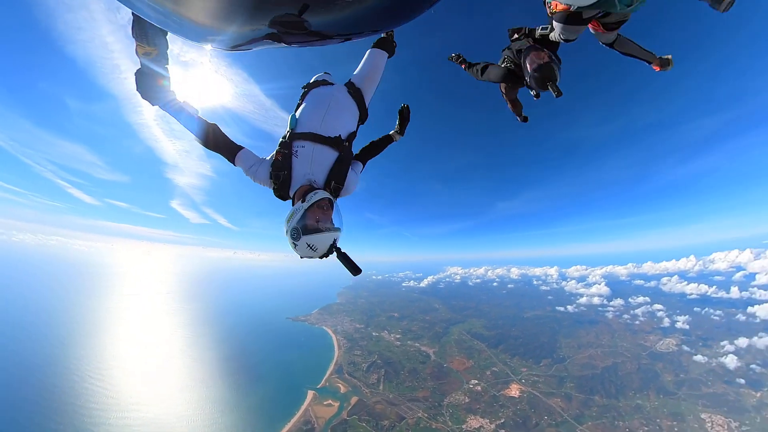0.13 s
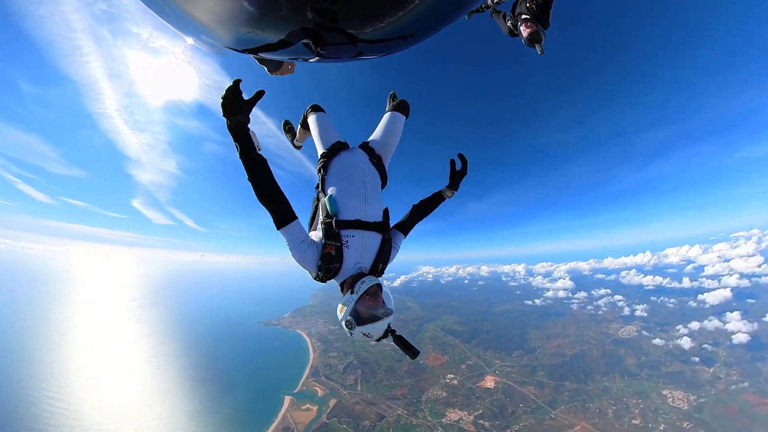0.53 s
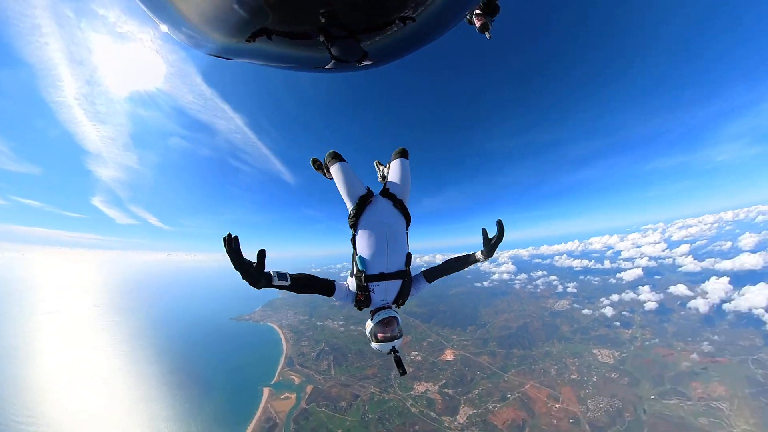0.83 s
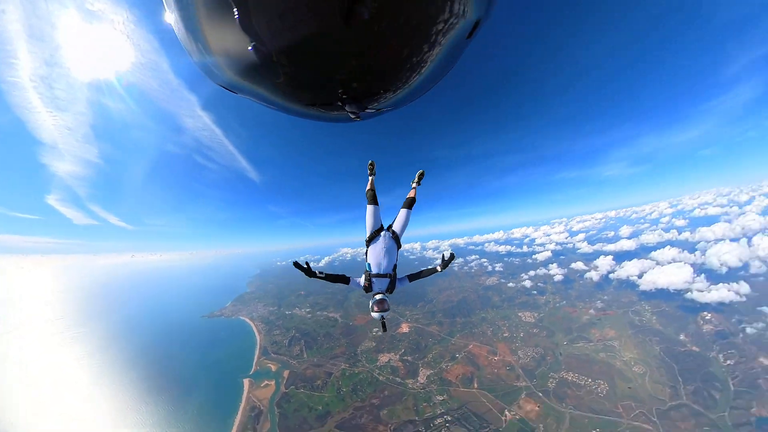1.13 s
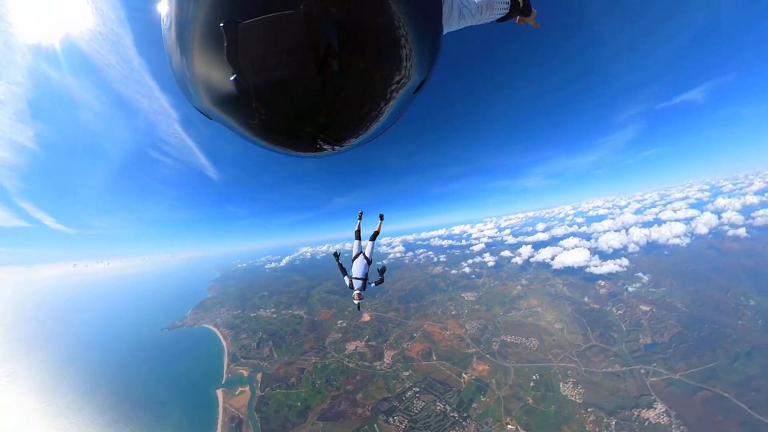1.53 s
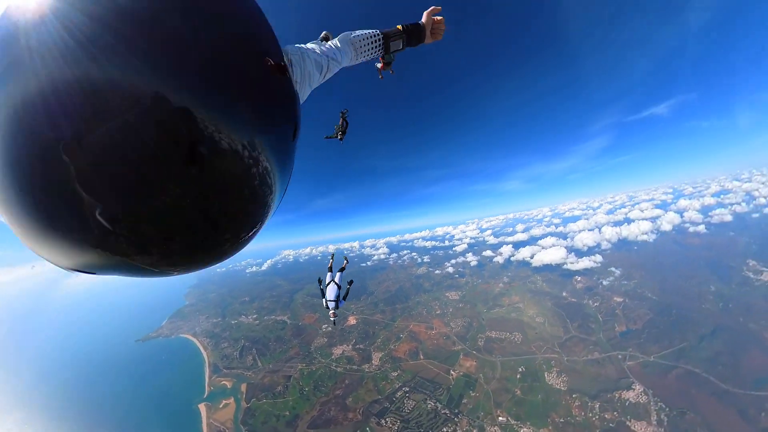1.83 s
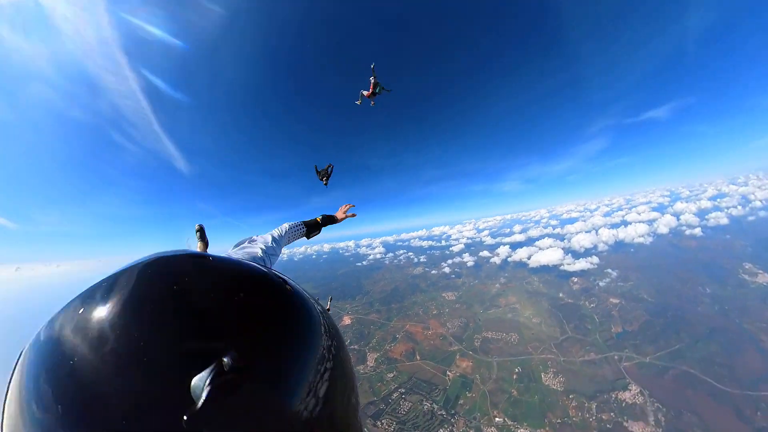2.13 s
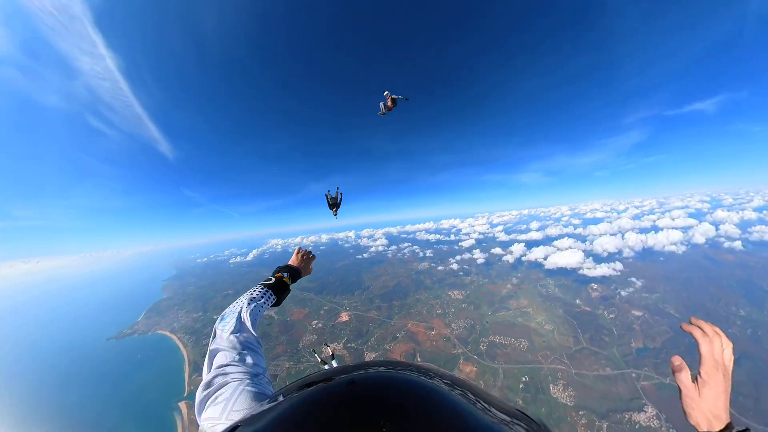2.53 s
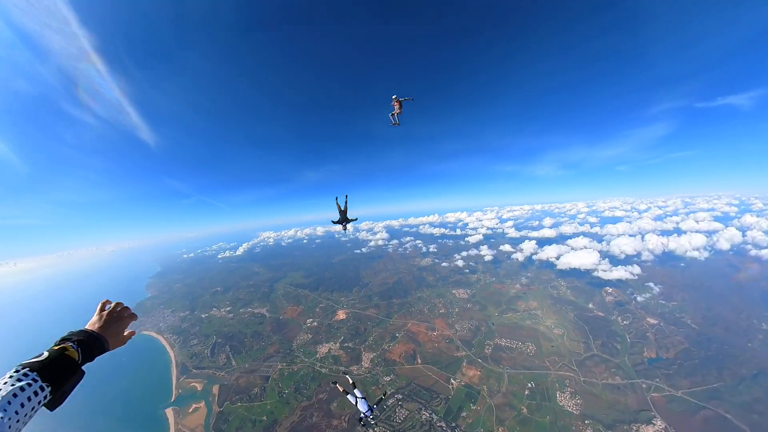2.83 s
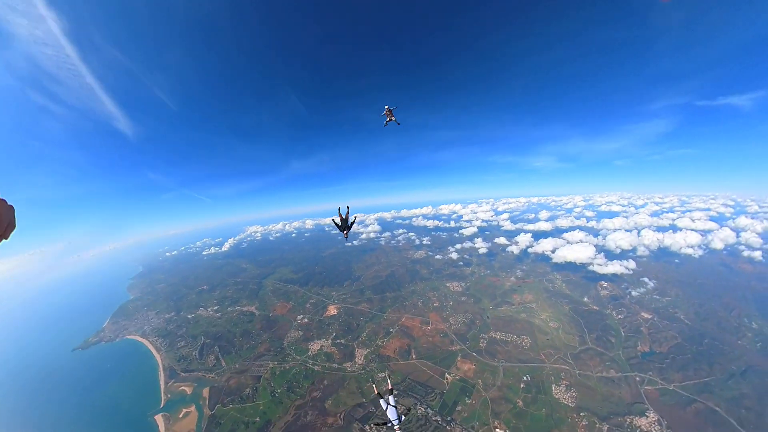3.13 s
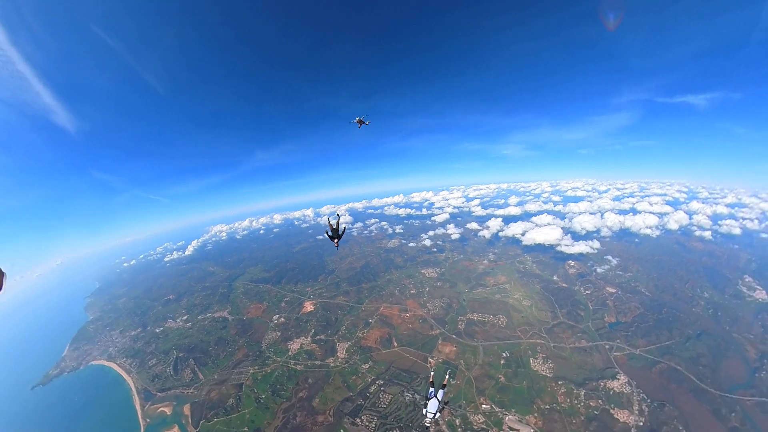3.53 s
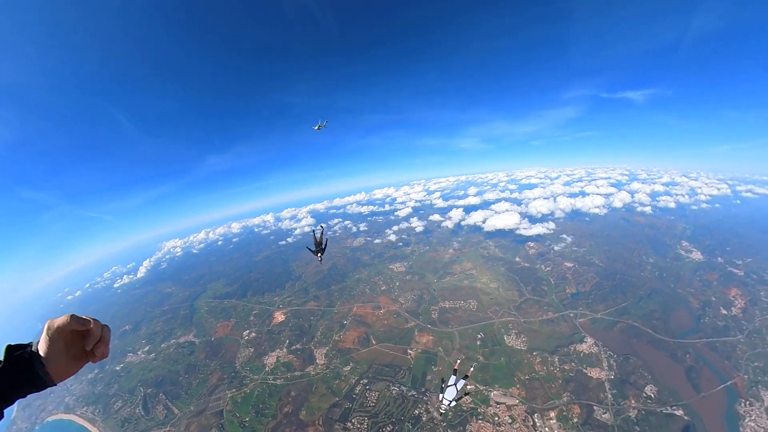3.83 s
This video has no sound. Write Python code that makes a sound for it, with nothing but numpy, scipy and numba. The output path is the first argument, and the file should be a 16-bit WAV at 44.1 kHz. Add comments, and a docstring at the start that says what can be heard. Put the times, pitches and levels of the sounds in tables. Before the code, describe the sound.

Fierce wind in skydiving freefall overloads a close helmet microphone, deep rumble left and thinner roar right, with crackles, a brief rising airy whistle on the left, then an abrupt dropout before the roar returns.

```python
"""Freefall wind tears at a helmet camera: heavy rumble on the left, a leaner roar and hiss on the right.
Each port shapes its own noise into three flickering bands; part of the rumble is common to both.
Pressure surges press a capsule against its end stop, so the roar crackles, breaks up or falls silent.
Pinned capsules flick and jolt, and the right port hums in short puffs like a blown bottle.
The left port whistles upward once as the head turns: noise through a climbing band-pass."""
import sys
import numpy as np
from scipy import signal
from scipy.fft import rfft, irfft
from scipy.io import wavfile
from scipy.ndimage import uniform_filter1d, minimum_filter1d
from numba import njit

SR = 44100
rng = np.random.default_rng(int(sys.argv[2]) if len(sys.argv) > 2 else 0)


def generate_wav(signal):
    """Clip the signal to [-1, 1] and save it as 16-bit WAV at the path in sys.argv[1]."""
    frames = np.transpose(np.atleast_2d(signal))
    scaled = np.clip(frames, -1, 1) * 32767
    pcm = np.round(scaled).astype(np.int16)
    wavfile.write(sys.argv[1], SR, pcm)


N = 176400

# Wind in each port before flicker and end stop; positive pressure pushes onto the stop:
# [t/s, rumble level/dB, roar level/dB, hiss level/dB, steady pressure/wind rms]
LEFT_WIND = [(0, -11, -21.5, -33, -3), (0.2, -7.5, -22.5, -31, -1), (0.36, -8.5, -21, -31.5, -1.5),
             (0.5, -11, -21, -36, -2.5), (0.6, -8.5, -27.5, -29.5, -0.5), (0.76, -10.5, -20.5, -32.5, -2.5),
             (0.95, -11, -22.5, -30, -1.5), (1.101, -5.5, -21, -29, -3.5), (1.25, -10.5, -16, -24.5, -2.5),
             (1.5, -9.5, -21.5, -33, -3.5), (1.65, -13.5, -18.5, -29.5, -4), (1.78, -14, -12.5, -27.5, -2),
             (2.22, -18, -20, -19.5, -2.5), (2.32, -15, -17.5, -17.5, -4), (2.421, -15, -12.5, -27.5, -2),
             (2.5, -25, -24.5, -40.5, -3), (2.58, -12.5, -14, -26.5, -1.5), (2.68, -14, -28, -41, -1.5),
             (2.78, -10, -17.5, -31.5, 0), (2.9, -16.5, -25.5, -35.5, -2), (3.02, -21, -23, -37, -2.5),
             (3.1, -14.5, -14, -24, -3), (3.2, -14.5, -19, -28, -2.5), (3.5, -14, -22.5, -33.5, -2.5),
             (3.75, -13.0, -21.5, -31, -2), (4, -7.5, -17, -26, -0.5)]
RIGHT_WIND = [(0, -31, -17.5, -23, -1), (0.148, -22, -14, -21, -2.1), (0.22, -27, -21.5, -32, -0.1),
              (0.32, -18, -10, -21, -0.28), (0.52, -24.5, -15.5, -22, -0.4), (0.71, -21, -10.5, -21, -0.95),
              (0.85, -23.5, -15.5, -25.5, -0.25), (1.08, -23.5, -17.5, -28.5, -0.7),
              (1.248, -29, -18, -17.5, -3.5), (1.45, -22, -18, -25, -2.3), (1.6, -16.5, -15, -16, -3),
              (1.78, -37, -18, -16.5, -1.02), (2.36, -16.5, -16.5, -20.5, -2), (2.5, -19, -17, -30, 0.45),
              (2.65, -15, -17, -28.5, -0.57), (2.8, -8.5, -19, -37.5, 0.24), (2.9, -12.5, -14, -26, 0.43),
              (3.02, -17.5, -26, -26.5, -1), (3.051, -17, -21.5, -19, -1.4),
              (3.11, -21.5, -23, -19.5, -1.9), (3.14, -20, -20, -28, -1.9), (3.3, -16.5, -17.5, -24, -0.5),
              (3.45, -14.5, -15, -19.5, -0.46), (3.6, -21.5, -18.5, -25, -1.1),
              (3.8, -17.5, -17, -23.5, 0.1), (3.92, -16.5, -16.5, -25, -0.17), (4, -19, -29, -20.5, -1.1)]
# Spectral tilt of the turbulence, relative within each band: [f/Hz, density level/dB]
LEFT_COLOUR = [(40, 8.5), (70, 4), (110, 4), (220, 0.9), (450, -4.5), (1000, -13.5), (2200, -24),
               (4000, -39), (5500, -42.5), (7000, -43.5), (9000, -59.5)]
RIGHT_COLOUR = [(40, -10.5), (70, 2), (110, 4), (220, -8), (450, -17), (1000, -18.5), (2200, -22.5),
                (4000, -26), (5500, -28), (7000, -31.5), (9000, -52.5)]
# Surges that press a capsule onto its stop: [start t/s, end t/s, full pressure/wind rms]
LEFT_SURGES = [(0.263, 0.294, 1.85), (0.385, .463, 6.5), (0.616, 0.733, 5.8), (0.63, 0.695, 25.),
               (0.944, 0.974, 2.5), (1.805, 2.215, 3.48), (1.84, 2.195, 6.6), (1.852, 2.186, 60.),
               (2.93, 2.941, 2.7), (2.956, 2.976, 4.2), (3.852, 3.872, 2.1)]
RIGHT_SURGES = [(0.16, 0.189, 1.7), (0.232, 0.243, 4), (0.26, 0.283, 8.1), (0.365, 0.461, 5.9),
                (0.52, 0.538, 5.6), (0.603, 0.687, 3.5), (0.723, 0.73, 6), (0.737, 0.756, 3.1),
                (0.885, 0.955, 0.64), (0.93, 0.951, 4.5), (0.966, 0.971, 2.6), (0.984, 0.993, 4.8),
                (1.003, 1.035, 5.9), (1.814, 2.328, 2.25), (1.849, 2.328, 3.4), (1.903, 2.315, 41),
                (2.44, 2.471, 2.7), (2.574, 2.589, 3.4), (2.641, 2.657, 5), (2.751, 2.77, 3.7),
                (2.835, 2.845, 3.9), (2.931, 2.942, 3.1), (2.951, 2.981, 7.6), (2.998, 3.012, 1.5),
                (3.127, 3.144, 1.7), (3.278, 3.289, 2.4), (3.66, 3.671, 3.3), (3.752, 3.757, 2.8),
                (3.89, 3.9, 2.5)]
# Spikes as a pinned capsule flicks off its stop and back: [t/s, depth/full scale before the mic filters]
LEFT_FLICKS = [(.7208, 0.37), (2.9747, 0.42)]
RIGHT_FLICKS = [(.2253, 0.75), (.4392, 0.41), (.4406, 0.43), (.647, 0.25), (.662, 0.56), (.6676, .55),
                (.6735, 0.16), (.683, 0.19), (.6907, 0.59), (.926, 0.52), (1.8379, 0.29), (1.8389, 0.19),
                (2.9272, 0.29), (2.9434, 0.57), (2.9463, 0.31), (2.9577, 0.37)]
# Steps as a pinned capsule slips: [t/s, step/full scale before the mic filters]
LEFT_JOLTS = [(.396, 0.2), (1.829, 0.16)]
RIGHT_JOLTS = [(.247, 0.23), (.437, 0.35), (.642, 0.3), (1.855, 0.53), (1.868, -0.31)]
# Bottle-like hums at the right port: [middle t/s, size/full scale before the mic filters]
PUFFS = [(.431, 0.081), (.631, 0.053), (1.031, .12)]
# Edge tone at the left port, ahead of its end stop: [t/s, f/Hz, width/Hz, level/dB]
WHISTLE = [(1.08, 2490, 300, -59), (1.13, 2755, 299, -40), (1.2, 3630, 300, -28), (1.35, 4300, 300, -37.5),
           (1.6, 5370, 1097, -40.5), (1.7, 5600, 1040, -23), (1.8, 6000, 780, -31),
           (1.85, 5980, 900, -63.5)]
# Camera tone colour, a wind-filter step near 700 Hz and capsule peaks:
# [f/Hz, width/Hz, left level/dB, right level/dB]
MIC_BUMPS = [(656, 120, -3.5, -2), (804, 160, 3, 3), (2870, 430, 3.5, 0.5), (5540, 1400, 7.5, 2)]
# Slow flicker per unit of random swing, a row per port: [rumble level/dB, roar level/dB, hiss level/dB]
FLICKER_DB = ((1.101, 1.5, 1.4), (0.75, 1.8, 1.65))
# Lift per unit of bursting eddy, none in the rumble, a row per port:
# [rumble level/dB, roar level/dB, hiss level/dB]
SNAP_DB = ((0, 4.2, 4.6), (0, 4.7, 4.64))

# Pairs are left, right.
RUMBLE_TOP_HZ, HISS_FROM_HZ = 245, 1290
RUMBLE_ALIKE = 0.38  # share of the rumble's noise power common to both ports
FLICKER_PER_S = (37, 45.)
EDDY_PER_S, EDDY_DB = 250., (3, 2)  # quick grain in roar and hiss
SNAP_PER_S, SNAP_S = (45., 70), 0.0045  # average rate, fade time constant
BUFFET_PER_S, BUFFET = (45, 45.), (.25, 0.39)  # random pressure swings, spread in wind rms
SURGE_RISE_S, SURGE_FALL_S = 0.0096, 0.0027
KNEE = (.45, .42)  # softness of the end stop in wind rms
FLICK_S, JOLT_S = .00017, .00025
PUFF_HZ, PUFF_S = 710, 0.0052  # PUFF_S runs from the middle to either end
LOW_CUT_HZ, LOW_CUT_Q = 51.6, 1.13
ROLL_OFF_HZ, ROLL_OFF_ORDER = (6800, 8060), 4
CEILING, LIMIT_S = .68, .004  # limiter ceiling in full scale, gain smoothing time
SELF_NOISE_DB = -79  # ahead of the final cut
TOP_HZ = 8800


def undb(db):
    """Turns a level in dB into the amplitude gain that carries it."""
    return 10 ** (np.asarray(db) / 20)


def column(table, index):
    """Draws a column of a time table as straight-line automation, one value per sample."""
    rows = np.array(table, float)
    return np.interp(np.arange(N) / SR, rows[:, 0], rows[:, index])


def walk(rate):
    """Random levels held for 1 / rate s and slewed twice over that time, with spread 1."""
    step = (np.arange(N) / SR * rate).astype(int)
    held = rng.standard_normal(4000)[step]
    hold = max(int(SR / rate), 1)
    smooth = uniform_filter1d(uniform_filter1d(held, hold), hold)
    return smooth / smooth.std()


def snaps(rate):
    """Eddies that burst at random: an instant rise, then an exponential fade, about a mean near 0."""
    when, chance = rng.random((N, 2)).T
    size = -np.log(1 - chance)  # many small bursts, few large ones
    fade = np.exp(-1 / (SNAP_S * SR))
    bursts = signal.lfilter([1], [1, -fade], (when < rate / SR) * size)
    return np.minimum(bursts, 1.8) - bursts.mean()


def band(noise, colour, lo_hz, hi_hz):
    """Turbulence of one eddy-size range: coloured noise between two soft edges, rms 1."""
    f = np.maximum(np.arange(N // 2 + 1) * SR / N, 1)
    rows = np.array(colour, float)
    tilt = undb(np.interp(np.log(f), np.log(rows[:, 0]), rows[:, 1]))
    edges = np.sqrt((1 + (lo_hz / f) ** 6) * (1 + (f / hi_hz) ** 6))
    shaped = irfft(rfft(noise) * tilt / edges, N)
    return shaped / shaped.std()


def turbulence(side, levels, colour, common):
    """All three bands share gusts; roar and hiss also share bursts and fast grain."""
    own = rng.standard_normal((3, N))
    gust, eddy = walk(FLICKER_PER_S[side]), walk(EDDY_PER_S)
    burst = snaps(SNAP_PER_S[side])
    low = np.sqrt(RUMBLE_ALIKE) * common + np.sqrt(1 - RUMBLE_ALIKE) * own[0]
    bands = (band(low, colour, 1.0, RUMBLE_TOP_HZ),
             band(own[1], colour, RUMBLE_TOP_HZ, HISS_FROM_HZ),
             band(own[2], colour, HISS_FROM_HZ, SR))
    air = np.zeros(N)
    for k, noise in enumerate(bands):
        swing_db = FLICKER_DB[side][k] * gust + SNAP_DB[side][k] * burst
        if k > 0:  # the rumble has no fast grain
            swing_db = swing_db + EDDY_DB[side] * eddy
        air += noise * levels[k] * undb(swing_db)
    return air


def surges(table):
    """Pressure ramps up, holds and lets go abruptly; overlapping surges add."""
    t = np.arange(N) / SR
    pressure = np.zeros(N)
    for start, end, size in table:
        rise = (t - start) / SURGE_RISE_S + 0.35
        fall = (end - t) / SURGE_FALL_S + .5
        pressure += size * np.clip(np.minimum(rise, fall), 0, 1)
    return pressure


def port(side, wind, colour, pinned, common, extra):
    """Air and pressure move a capsule whose soft end stop flattens travel on one side."""
    levels = [undb(column(wind, index=k)) for k in (1, 2, 3)]
    air = extra + turbulence(side, levels, colour, common)
    rms = np.sqrt(sum(level ** 2 for level in levels))
    push = column(wind, index=4) + BUFFET[side] * walk(BUFFET_PER_S[side]) + surges(pinned)
    travel = .5 * (air + push * rms)
    # free travel passes at full gain; travel into the stop tends to zero
    return travel - np.sqrt(travel ** 2 + (KNEE[side] * rms) ** 2)


def flicks(table):
    """A capsule leaves its stop and returns: narrow negative spikes with exponential flanks."""
    t = np.arange(N) / SR
    return sum(-size * np.exp(-abs(t - s) / FLICK_S) for s, size in table)


def jolts(table):
    """A diaphragm slips to a new rest position: very short ramps that stay where they land."""
    t = np.arange(N) / SR
    return sum(size * np.clip((t - s) / JOLT_S, 0, 1) for s, size in table)


def puffs():
    """The port cavity hums like a blown bottle: a few sine cycles under a rounded envelope."""
    t = np.arange(N) / SR
    hum = np.zeros(N)
    for middle, size in PUFFS:
        envelope = np.cos(np.pi / 2 * np.clip((t - middle) / PUFF_S, -1, 1))
        hum += size * envelope * np.sin(2 * np.pi * PUFF_HZ * (t - middle))
    return hum


@njit
def svf(x, hz, width):
    """State-variable band-pass whose centre and width move, gain 1 at the centre."""
    y, b, l = np.empty(len(x)), 0., 0.  # b and l: band and low integrator states
    for i in range(len(x)):
        g, k = np.tan(np.pi * hz[i] / SR), width[i] / hz[i]
        v = (b + g * (x[i] - l)) / (1 + g * (g + k))
        b, l, y[i] = 2 * v - b, l + 2 * g * v, k * v
    return y


def whistle():
    """A breathy edge tone: noise through two moving resonances that climb and broaden."""
    hz, width = column(WHISTLE, index=1), column(WHISTLE, index=2)
    tone = svf(svf(rng.standard_normal(N), hz, width), hz, width)
    even = np.sqrt(2 * SR / (np.pi * width))  # keeps loudness steady as the width moves
    return tone * even * undb(column(WHISTLE, index=3))


def scene():
    """Two wind-blown ports that share part of the rumble, each with its capsule's slips."""
    common = rng.standard_normal(N)
    left = port(0, LEFT_WIND, LEFT_COLOUR, LEFT_SURGES, common, whistle())
    left = left + flicks(LEFT_FLICKS) + jolts(LEFT_JOLTS)
    right = port(1, RIGHT_WIND, RIGHT_COLOUR, RIGHT_SURGES, common, 0)
    right = right + flicks(RIGHT_FLICKS) + jolts(RIGHT_JOLTS) + puffs()
    return np.array([left, right])


def low_cut(x):
    """Two identical resonant high-passes, so steps ring as they die away."""
    w = np.tan(np.pi * LOW_CUT_HZ / SR)
    b = [1, -2, 1]
    a = [1 + w / LOW_CUT_Q + w * w, 2 * (w * w - 1), 1 - w / LOW_CUT_Q + w * w]
    return signal.lfilter(b, a, signal.lfilter(b, a, x))


def bump(x, hz, width_hz, *db):
    """Raises or lowers a band, by its own amount in each channel."""
    in_band = signal.lfilter(*signal.iirpeak(hz, hz / width_hz, fs=SR), x)
    return x + (undb(db)[:, None] - 1) * in_band


def roll_off(x, hz):
    """A low-pass that dulls the top of one microphone."""
    return signal.sosfilt(signal.butter(ROLL_OFF_ORDER, hz, fs=SR, output="sos"), x)


def limit(x):
    """A peak limiter: each channel's gain dips around its peaks and is smoothed."""
    k = int(LIMIT_S * SR)
    gain = CEILING / np.maximum(abs(x), CEILING)
    return x * uniform_filter1d(minimum_filter1d(gain, 2 * k), k)


def record(dry):
    """Low cut, camera tone colour, dull top, peak limiter, faint self-noise and a steep final cut."""
    x = low_cut(dry - dry[:, :1])  # start from rest, without a thump
    for row in MIC_BUMPS:
        x = bump(x, *row)
    x = np.array([roll_off(channel, hz) for hz, channel in zip(ROLL_OFF_HZ, x)])
    x = limit(x)
    x = x + undb(SELF_NOISE_DB) * rng.standard_normal(x.shape)
    return signal.sosfilt(signal.ellip(8, .2, 50, TOP_HZ, fs=SR, output="sos"), x)


dry = scene()
out = record(dry)
generate_wav(out)
```